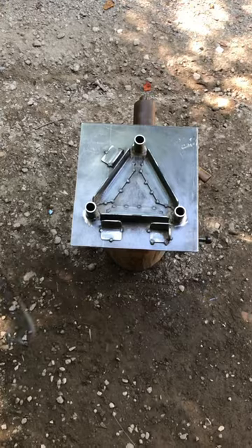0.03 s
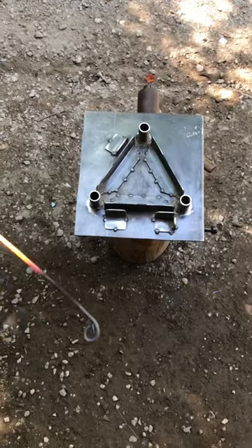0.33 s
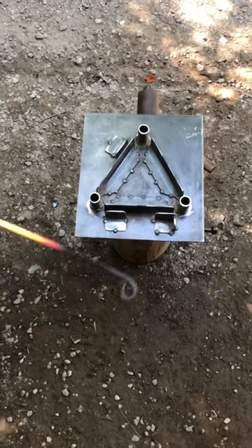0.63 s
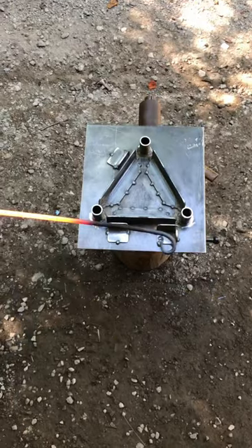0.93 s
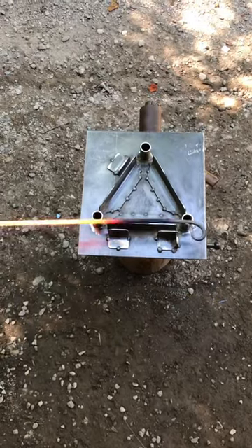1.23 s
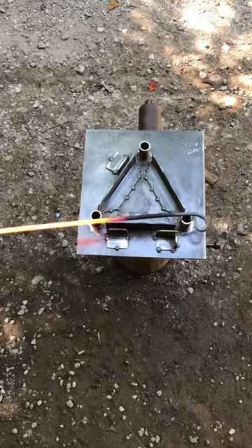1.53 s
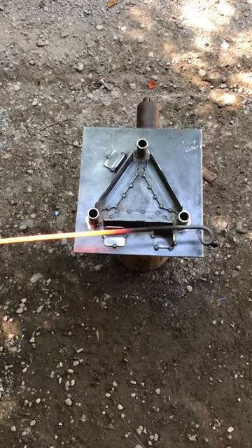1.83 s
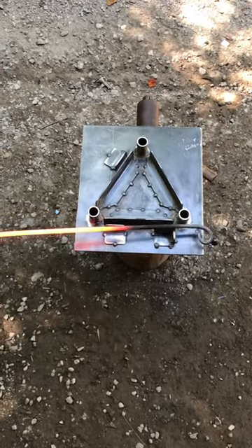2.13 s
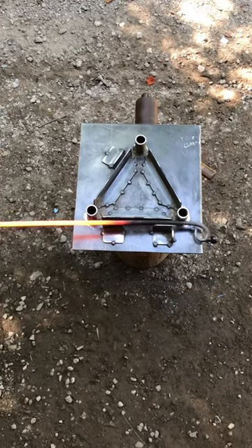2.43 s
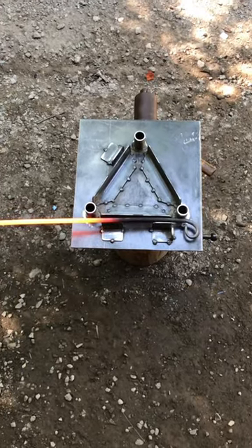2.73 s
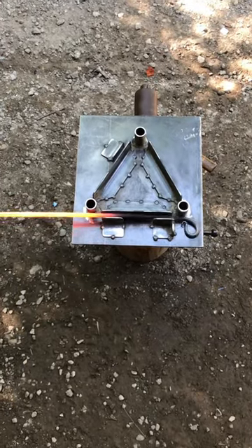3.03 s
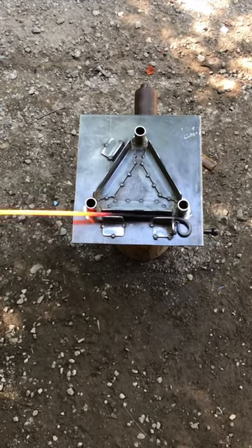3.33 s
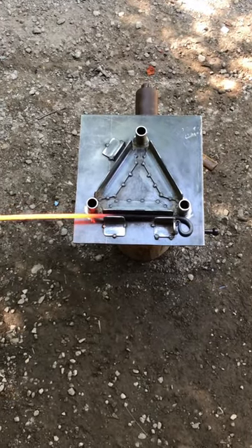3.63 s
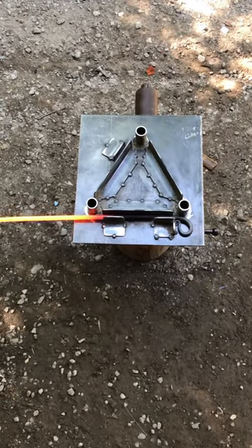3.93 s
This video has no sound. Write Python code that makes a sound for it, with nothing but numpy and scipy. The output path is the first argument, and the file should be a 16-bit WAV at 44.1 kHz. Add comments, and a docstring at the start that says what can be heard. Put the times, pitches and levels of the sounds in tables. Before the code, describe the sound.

A steel rod clinks, scrapes and drops into a steel jig outdoors.

```python
"""Hot rod in a bending jig

Outdoors, shoes shift on gravel in bursts of tiny grain impacts. A hot steel rod then clinks on the
plate of a steel jig, slides, squeaks by stick-slip, drops hard into its slot and scrapes home.
Strikes and slips ring the modes of jig and rod. A low steady roar, probably the forge, fills the yard."""
import sys
import numpy as np
from scipy import signal
from scipy.fft import rfft, irfft, next_fast_len
from scipy.io import wavfile
from scipy.ndimage import map_coordinates

SR = 44100
rng = np.random.default_rng(int(sys.argv[2]) if len(sys.argv) > 2 else 0)


def digitize_waveform(pressure):
    """Quantize a signal to 16-bit integers and store it at the path in sys.argv[1].

    Rows of a 2-D input are taken as channels; values are limited to [-1, 1].
    """
    field = np.atleast_2d(pressure).T
    bounded = np.clip(field, -1, 1)
    quanta = np.round(bounded * 32767).astype(np.int16)
    wavfile.write(sys.argv[1], SR, quanta)


N = 176400
STEEL_LOW_HZ = 680


def clinks():
    """Rod strikes jig: one impulse response per contact, with its own spectrum."""
    # (band frequency [Hz])
    bands_hz = [900, 1800, 2800, 3800, 4800, 7000, 9500, 12000, 14000, 15500]
    # strikes (time [s], gain per band [dB]..., rod ring [dB], favoured pitch [Hz], seat [0-1])
    strikes = [(2.0434, -11, -14, -12, -13, -24.5, -15.5, -29.5, -30, -44, -44, -23, 3670, .05),
               (2.077, -28, -29, -28, -24, -48, -50, -55, -58, -60, -62, -20, 2557, .05),
               (2.181, -27.5, -26.5, -29.5, -43, -55, -60, -62, -60, -60, -62, -20, 1775, .05),
               (2.2822, -14.5, -12, -13, -23.5, -18, -31, -41, -48, -28, -54, -22, 2577, 0.04),
               (2.325, -25, -35, -26, -41, -50, -50, -56, -49, -43, -58, -17, 1776, .05),
               (2.548, -32, -25, -33, -42, -43, -59, -56, -58, -60, -62, -12, 2660, .05),
               (3.008, -28, -28, -40, -44, -52, -56, -58, -58, -58, -64, -16, 895, .3),
               (3.0839, -9, -9.5, -7.5, -8.5, -11, -7, -5, -1.5, -8, -12, -25, 2830, 1),
               (3.154, -17, -28, -36, -39, -39, -52, -56, -56, -56, -60, -24, 1022, 1),
               (3.174, -30, -33, -29, -37, -35, -49, -56, -56, -56, -60, -24, 2600, 0.49),
               (3.3018, -29, -24, -13, -27, -54, -51, -40, -37, -32, -49, 4, 2620, .1),
               (3.3125, -34, -33, -35, -24, -44, -43, -36, -36, -34, -48, 0, 3540, .1),
               (3.318, -31, -33, -45, -32, -28, -30, -43, -45, -41, -55, 1, 5800, .6),
               (3.329, -29, -28, -38, -24, -25.5, -16.5, -19.5, -21, -28, -35, -0.5, 1554, .4),
               (3.434, -35, -34.5, -44, -51, -54, -56, -60, -60, -60, -62, -3, 1760, 0.54)]
    out = np.zeros(N)
    for time_s, *gains_db, rod_db, favoured_hz, seat in strikes:
        add(out, time_s, banded(steel(rod_db, favoured_hz, seat), bands_hz, gains_db, STEEL_LOW_HZ))
    return out


def steel(rod_db, favoured_hz, seat):
    """Impulse response of jig and rod: clear modes over dense clatter. Seat 0 = rim, 1 = slot."""
    # (frequency [Hz], level struck on rim [dB], level struck in slot [dB], t60 [s])
    jig_modes = [(826, -13, -15, .15), (875, -18, -20, .15), (1035, -20, -15, .14), (1135, -22, -20, .22),
                 (1410, -24, -27, .12), (1660, -17, -16, .14), (1776, -16, -27, .17), (1997, -26, -21, .2),
                 (2115, -29, -23, .12), (2555, -18, -28, .1), (2665, -20, -29, .1), (2810, -20, -28, .13),
                 (2868, -27, -16, .095), (2940, -32, -19, .07), (3012, -27, -20, .14),
                 (3195, -23, -19, .13), (3539, -26, -20, .13), (3784, -19, -30, .13), (3865, -21, -20, .1),
                 (4134, -32, -22, .14), (4581, -23, -28, .15), (4630, -30, -18, .12), (5250, -26, -26, .12),
                 (5550, -28, -23, .19), (5648, -20, -27, .13), (5740, -30, -25, .24), (6557, -19, -22, .1),
                 (6862, -21, -24, .13), (7040, -15, -15, .12), (7285, -24, -22, .1), (8323, -22, -23, .1),
                 (8522, -18, -16, .13), (9007, -25, -22, .09), (9792, -17, -27, .17),
                 (10430, -24, -16, .06), (10753, -27, -24, .07), (11080, -18, -19, .09),
                 (11720, -19, -24, .14), (12058, -26, -11, .075), (12330, -28, -21, .08),
                 (14170, -15, -20, .14), (14782, -25, -21, .11), (14959, -25, -21, .11)]
    # (frequency [Hz], level [dB], t60 [s])
    rod_modes = [(877, -19, .22), (1599, -17, .62), (2323, -22, .13), (3540, -23, .1), (7690, -23, .12),
                 (10233, -21, .12), (13222, -24, .22)]
    t = np.arange(SR // 2) / SR
    seated_modes = [(hz, rim + (slot - rim) * seat, t60) for hz, rim, slot, t60 in jig_modes]
    body = clatter(t) + ring(seated_modes, t) + amp(rod_db) * ring(rod_modes, t)
    lift_db, relative_width = 7.5, 0.028  # the contact point favours modes near one pitch
    return coloured(body, lambda hz: lift_db / (1 + ((hz / favoured_hz - 1) / relative_width) ** 2))


def ring(modes, t, scatter_db=2):
    """Damped modes, excited a little differently at each contact."""
    out = np.zeros(len(t))
    for hz, db, t60_s in modes:
        decay = amp(db + scatter_db * rng.standard_normal() - 60 * t / t60_s)
        out += decay * np.sin(2 * np.pi * (hz * t + rng.random()))
    return out


def clatter(t):
    """Crowded lesser modes of the steel: noise with frequency-dependent decay."""
    # (frequency [Hz], t60 [s])
    decay_times = [(600, 0.18), (2500, 0.079), (7000, 0.074), (15000, 0.087)]
    # (frequency [Hz], gain [dB])
    spectrum = [(700, -2), (3000, -2), (7000, -3), (15000, -5)]
    # gaps between mode clusters (centre [Hz], width [Hz], depth [dB])
    gaps = [(955, 37, 14), (1315, 85, 3), (1630, 23, 17.5), (1950, 40, 8), (2170, 170, -1), (3330, 100, -1),
            (4580, 97, 13), (10380, 160, 15)]
    bins_hz, frames_s, noise = signal.stft(rng.standard_normal(len(t)), SR, nperseg=128)
    decay = amp(-60 * frames_s / along(decay_times, bins_hz)[:, None])
    burst = signal.istft(noise * decay, SR, nperseg=128)[1][:len(t)]
    return coloured(burst, lambda hz: along(spectrum, hz) - valleys(gaps, hz))


def slides(edge_s=0.0045, swell_db=6):
    """Tiny slips keep the steel ringing as the rod slides; the push grows over each stroke."""
    # (band frequency [Hz])
    bands_hz = [900, 1800, 2600, 3600, 5500, 8000, 11000, 13300, 15500]
    # (time [s], length [s], gain per band [dB]..., rod ring [dB], favoured pitch [Hz], seat [0-1])
    strokes = [(2.41, .33, -42, -57, -52, -62, -66, -67, -68, -57, -67.5, -7, 13222, .05),
               (2.969, 0.039, -33, -33, -34, -41, -38.5, -59, -49, -49, -63, -23, 1190, 0.26),
               (3.035, 0.037, -24.5, -33, -30, -38, -43, -46, -43, -47, -55.5, -15, 2620, 0.9),
               (3.275, 0.04, -24, -34, -23, -29, -45, -35, -37, -31, -44, 2, 2560, .1),
               (3.456, 0.045, -52, -53, -59, -61, -58, -62, -57.5, -57, -65.5, -20, 10430, .5),
               (3.569, 0.033, -48, -49, -58, -52, -59, -62, -60, -58, -60, -17, 10550, .5),
               (3.655, 0.054, -44.5, -41, -62, -49, -57, -58, -51, -59, -51, -20.5, 10300, 0.41),
               (3.80, 0.053, -45, -46, -50, -53, -60, -59.5, -59, -62, -62, -18, 10300, 0.45)]
    out, t = np.zeros(N), np.arange(SR // 2) / SR
    for time_s, length_s, *gains_db, rod_db, favoured_hz, seat in strokes:
        gate = np.clip(np.minimum(t, length_s - t) / edge_s, 0, 1)
        push = gate * amp(swell_db * np.minimum(t / length_s, 1))
        body = steel(rod_db, favoured_hz, seat)
        slips = ticks(len(t), rate_per_s=880, scatter_db=3)
        rub = signal.fftconvolve(push * slips, body / np.linalg.norm(body))
        add(out, time_s, banded(rub, bands_hz, gains_db, STEEL_LOW_HZ))
    return out


def squeak(start_s=2.965, rise_s=0.02, t60_s=0.17, pitch_hz=1236):
    """Brief stick-slip of the rod at a slightly wavering pitch."""
    # (harmonic number, level [dB])
    partials = [(1, -37), (2, -30), (3, -41), (5, -55)]
    t = np.arange(N) / SR - start_s
    swell = np.clip(t / rise_s, 0, 1) * amp(-60 * np.maximum(t - rise_s, 0) / t60_s)
    phase = 2 * np.pi * np.cumsum(pitch_hz * (1 + 0.013 * wobble(280))) / SR
    flutter = amp(1.7 * wobble(160))
    return swell * flutter * sum(amp(db) * np.sin(k * phase) for k, db in partials)


def gravel():
    """Each shift of a shoe is a short swell of crunching grains."""
    # (band frequency [Hz])
    bands_hz = [1200, 3000, 5500, 13000]
    # (peak time [s], Gaussian width [s], gain per band [dB]...)
    scuffs = [(.07, 0.025, -25, -38.5, -46, -55), (0.077, .0013, -18, -36, -47, -58),
              (.087, 0.0011, -16.5, -36, -47, -62), (0.117, 0.013, -30, -40, -44, -49),
              (.125, 0.00098, -25, -33, -42, -52), (0.14, 0.0015, -36, -36, -42, -48),
              (.168, 0.016, -40, -48, -47, -60), (0.271, 0.0023, -35, -39, -57, -65),
              (.422, 0.0015, -19, -43, -39, -64), (0.516, 0.02, -41, -46, -45, -60),
              (0.572, 0.0014, -35, -37, -33, -57), (.582, .002, -35, -36, -46, -64),
              (.635, 0.0014, -23, -23, -25, -50), (0.643, 0.029, -28, -38.5, -43, -56),
              (0.709, 0.021, -50, -43, -59, -55), (1.038, .011, -34, -43, -50, -53),
              (1.515, 0.0073, -36, -46, -50, -56)]
    out, t = np.zeros(N), np.arange(SR // 7) / SR
    for peak_s, width_s, *gains_db in scuffs:
        swell = np.exp(-0.5 * ((t - t.mean()) / width_s) ** 2)
        add(out, peak_s - t.mean(), banded(crunch(len(t)) * swell, bands_hz, gains_db, low_hz=770))
    return out


def crunch(size):
    """Gravel grains, each stone size ticking in its own band; rms 1."""
    # coarse to fine (pitch [Hz], grain rate [1/s])
    stones = [(1000, 700), (2000, 900), (4000, 1500), (7000, 2200), (12000, 3000)]
    out = np.zeros(size)
    for pitch_hz, rate_per_s in stones:
        grains = ticks(size, rate_per_s, scatter_db=5.5)
        out += coloured(grains, lambda hz: -20 * np.log2((hz + 1) / pitch_hz) ** 2)
    return unit(out)


def forge(roar_db=-32, roar_sway_db=1.18, hiss_db=-48, hiss_sway_db=0.18):
    """Steady low roar in a row of resonances, faint airy hiss above."""
    # (frequency [Hz], relative density [dB])
    roar_spectrum = [(20, -33), (32, -50), (50, -19), (66, -9), (85, -16.5), (108, -13), (150, -6.5),
                     (178, 0.5), (215, -1), (250, -2), (300, -3.5), (400, -4.5), (540, -10.5), (600, -15),
                     (660, -19), (900, -24), (1300, -32), (2500, -61)]
    # valleys between resonances (centre [Hz], width [Hz], depth [dB])
    dips = [(139, 7.5, 4.5), (280.8, 6, 16.5), (336.4, 8.4, 15.5), (387.3, 6.4, 10), (436.6, 8.6, 13),
            (492.3, 4.1, 9)]
    # (frequency [Hz], relative density [dB])
    hiss_spectrum = [(590, -28.5), (1000, -1.5), (1100, -5), (1250, 0.5), (1830, -7), (2250, -6.5),
                     (4900, -19.5), (7440, -21.5), (10100, -31), (11700, -28.5), (16000, -43.5)]
    roar = unit(coloured(rng.standard_normal(N), lambda hz: along(roar_spectrum, hz) - valleys(dips, hz)))
    hiss = unit(coloured(rng.standard_normal(N), lambda hz: along(hiss_spectrum, hz)))
    roar *= amp(roar_db + roar_sway_db * wobble(7.06))
    hiss *= amp(hiss_db + hiss_sway_db * wobble(7.62))
    return roar + hiss


def yard(x, level_db=-20, t60_s=0.25, rise_s=0.0093):
    """Faint short echo from the surroundings."""
    t = np.arange(SR // 2) / SR
    tail = rng.standard_normal(len(t)) * amp(-60 * t / t60_s) * np.minimum(t / rise_s, 1)
    return amp(level_db) * signal.fftconvolve(x, tail / np.linalg.norm(tail))[:N]


def ticks(size, rate_per_s, scatter_db):
    """Random tiny impacts of uneven size; rms 1."""
    impulses = (rng.random(size) < rate_per_s / SR) * np.sign(rng.standard_normal(size))
    return unit(impulses * amp(scatter_db * np.clip(rng.standard_normal(size), -2, 2)))


def wobble(knots_per_s):
    """Smooth random curve."""
    knots = rng.standard_normal(int(N * knots_per_s / SR) + 4)
    return map_coordinates(knots, [np.arange(N) * knots_per_s / SR])


def coloured(x, curve_db):
    """Minimum-phase filter with gain curve_db(hz)."""
    size = 2 * next_fast_len(len(x) // 2 + 4096)
    gain = amp(curve_db(np.fft.rfftfreq(size, 1 / SR)))
    cepstrum = irfft(np.log(np.maximum(gain, 1e-6)))
    cepstrum[1:size // 2] *= 2  # fold onto positive time
    cepstrum[size // 2 + 1:] = 0
    return irfft(rfft(x, size) * np.exp(rfft(cepstrum)))[:len(x)]


def banded(x, bands_hz, gains_db, low_hz):
    """Gain per band, steep roll-off below low_hz."""
    points = list(zip(bands_hz, gains_db))
    return coloured(x, lambda hz: along(points, hz) - 10 * np.log10(1 + (low_hz / (hz + 1)) ** 10))


def along(points, hz):
    """Interpolate (frequency [Hz], value) points on a log axis."""
    knots_hz, values = np.transpose(points)
    return np.interp(np.log(hz + 1), np.log(knots_hz + 1), values)


def valleys(dips, hz):
    """Summed depth [dB] of Gaussian dips."""
    return sum(db * np.exp(-0.5 * ((hz - centre) / width) ** 2) for centre, width, db in dips)


def amp(db):
    """Decibels to gain."""
    return 10 ** (np.asarray(db) / 20)


def unit(x):
    """Scale to rms 1."""
    return x / np.sqrt(np.mean(x ** 2) + 1e-20)


def add(track, time_s, sound):
    """Mix sound in at time_s."""
    part = track[max(0, round(time_s * SR)):][:len(sound)]
    part += sound[:len(part)]


def scene():
    """Steel and gravel close by, forge behind; mono."""
    near = clinks() + slides() + squeak() + gravel()
    return (near + yard(near) + forge())[None]


def record(dry):
    """Microphone opens, clips near full scale and limits the band."""
    open_s, ceiling, top_hz = 0.035, 0.85, 15700
    clipped = np.clip(dry * (np.arange(N) / SR > open_s), -ceiling, ceiling)
    return signal.sosfilt(signal.butter(24, top_hz, fs=SR, output="sos"), clipped)


dry = scene()
out = record(dry)
digitize_waveform(out)
```